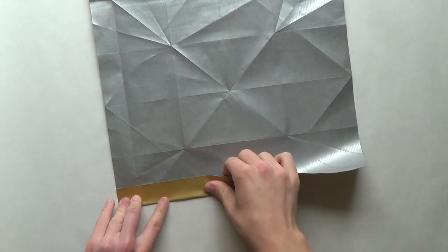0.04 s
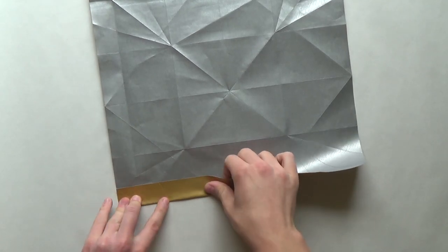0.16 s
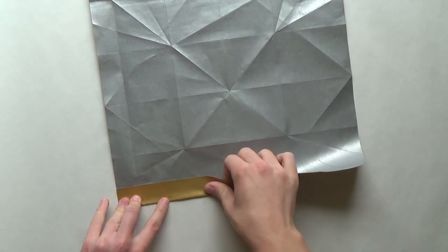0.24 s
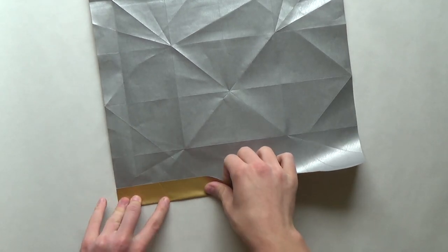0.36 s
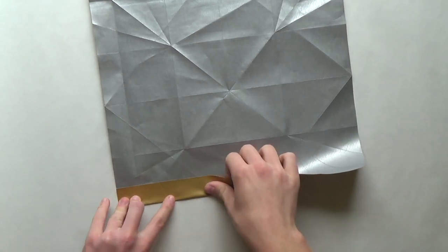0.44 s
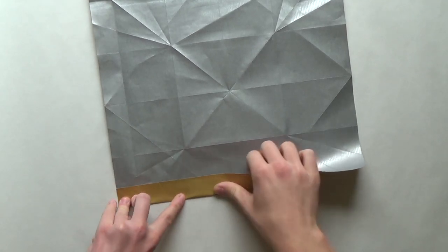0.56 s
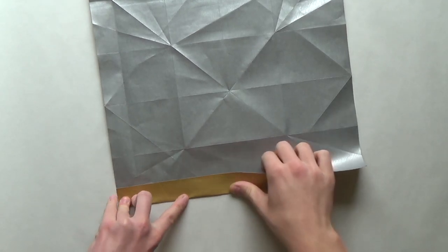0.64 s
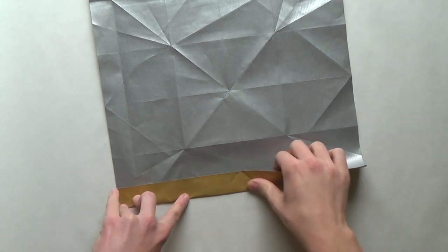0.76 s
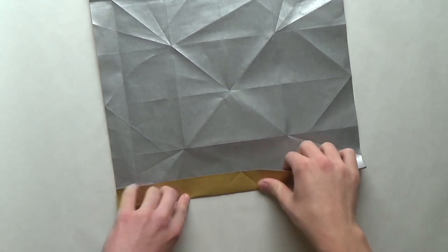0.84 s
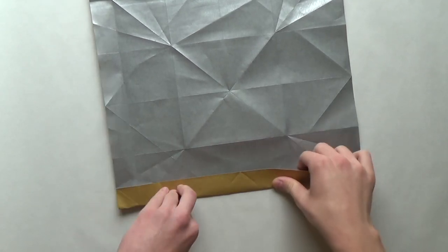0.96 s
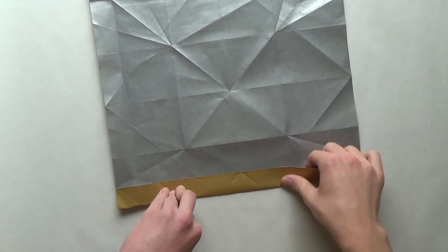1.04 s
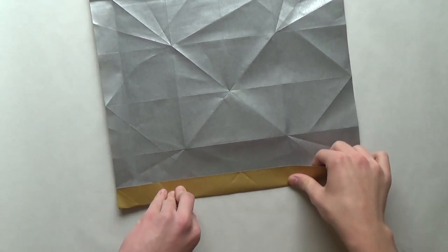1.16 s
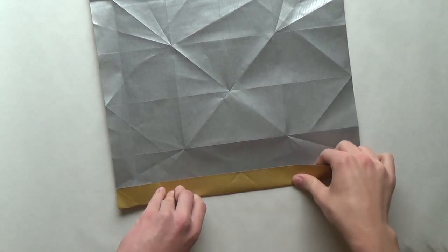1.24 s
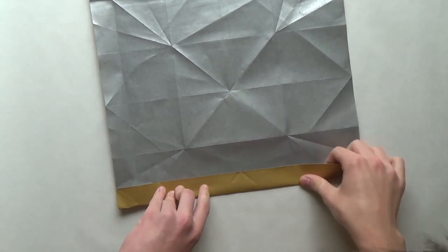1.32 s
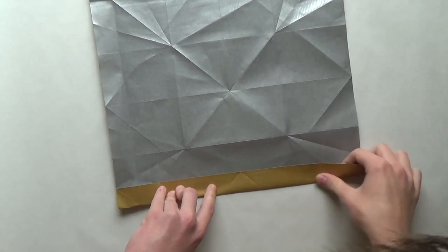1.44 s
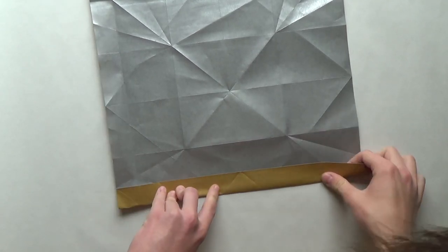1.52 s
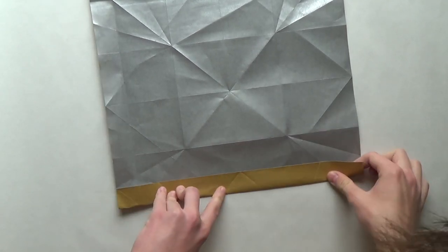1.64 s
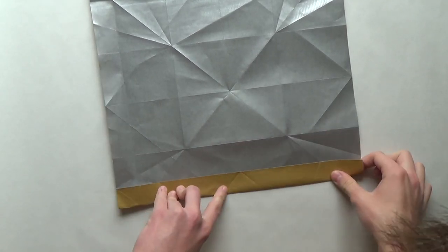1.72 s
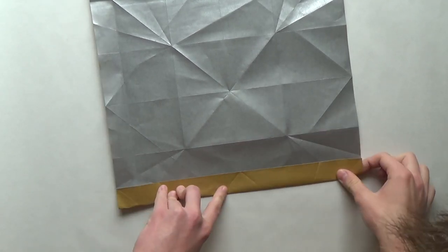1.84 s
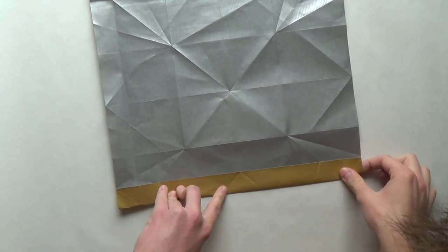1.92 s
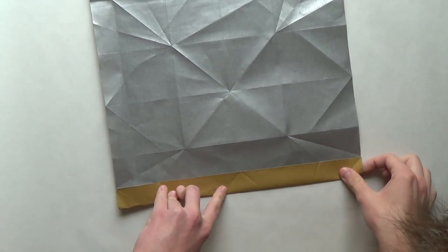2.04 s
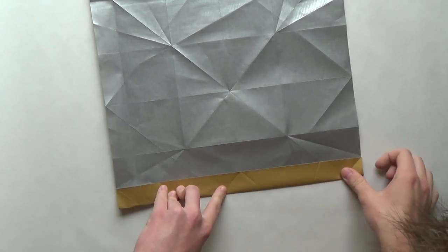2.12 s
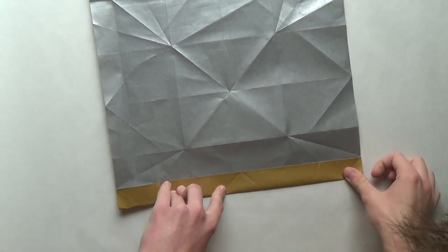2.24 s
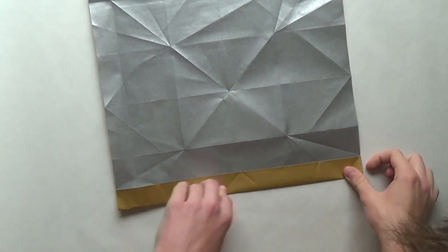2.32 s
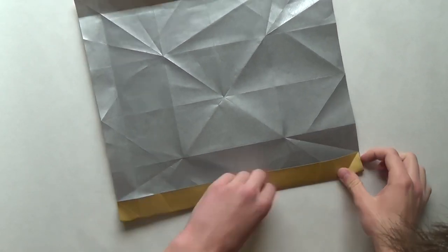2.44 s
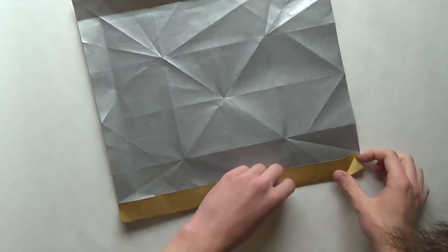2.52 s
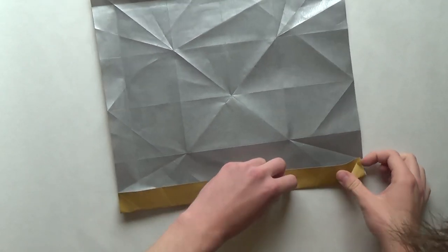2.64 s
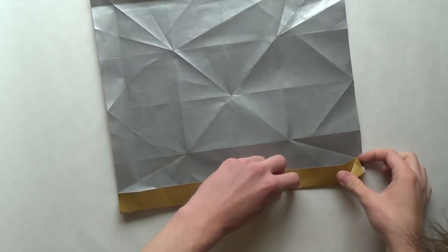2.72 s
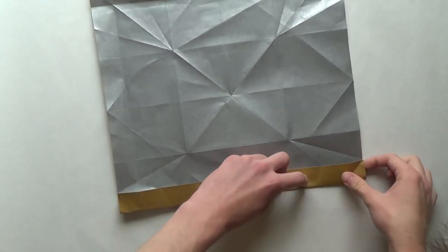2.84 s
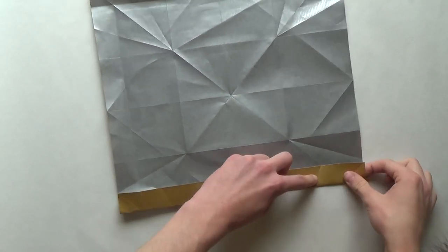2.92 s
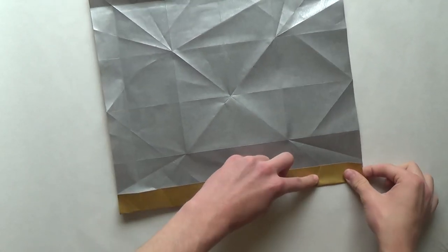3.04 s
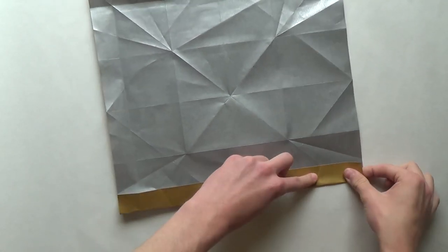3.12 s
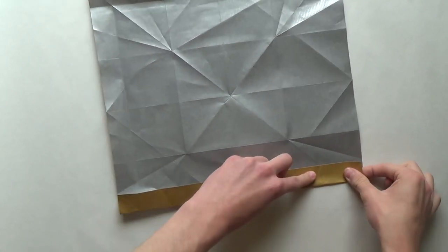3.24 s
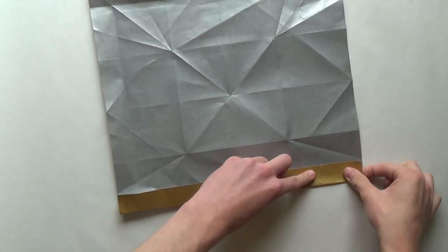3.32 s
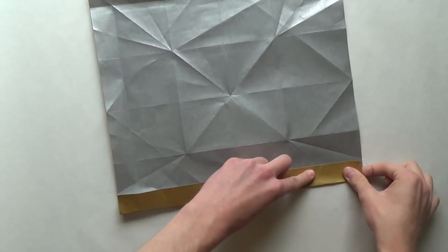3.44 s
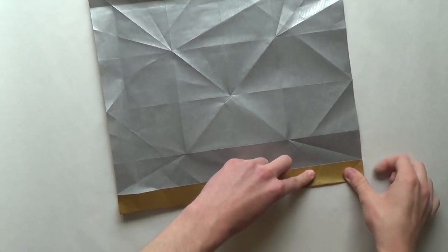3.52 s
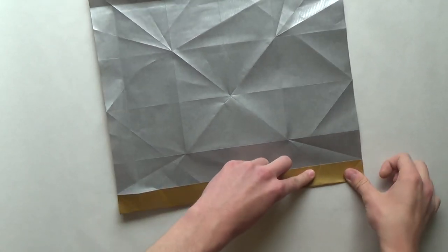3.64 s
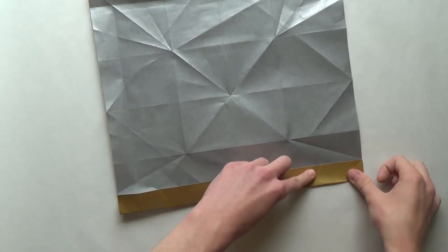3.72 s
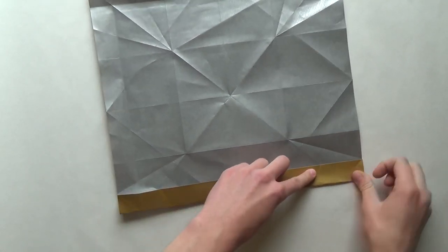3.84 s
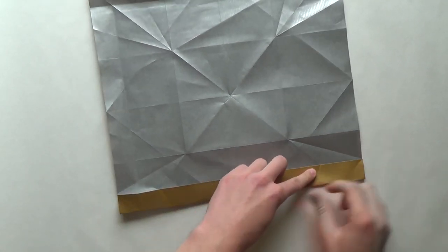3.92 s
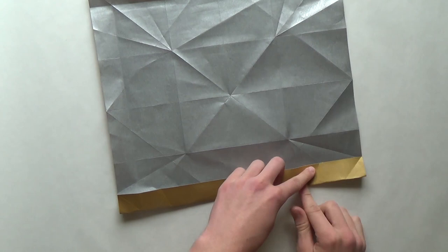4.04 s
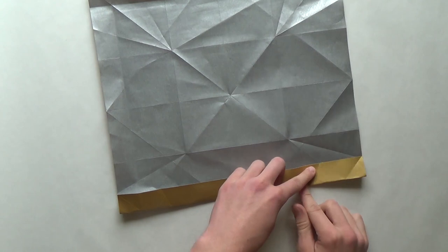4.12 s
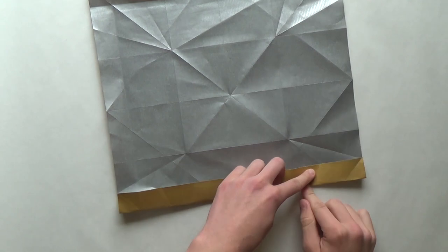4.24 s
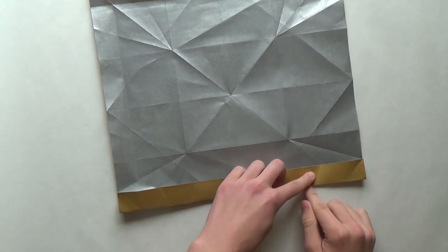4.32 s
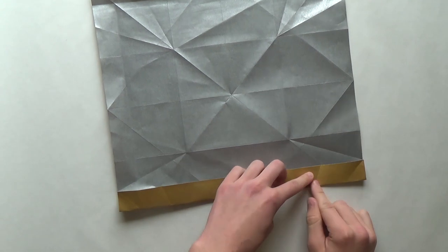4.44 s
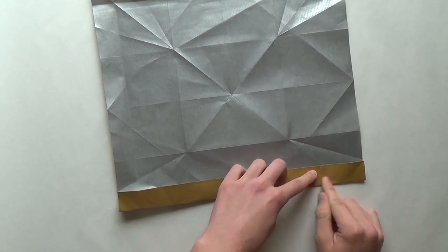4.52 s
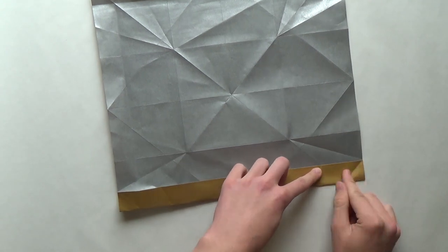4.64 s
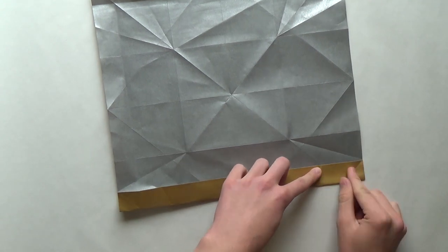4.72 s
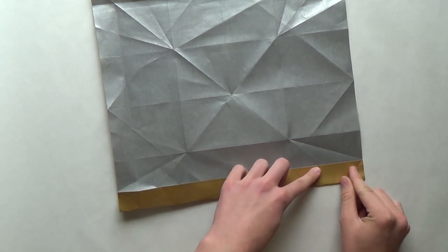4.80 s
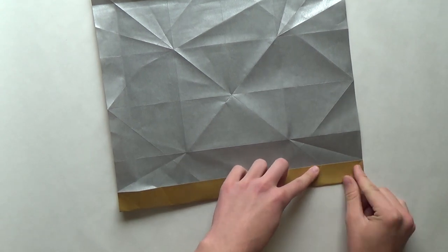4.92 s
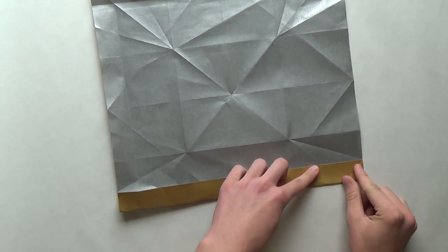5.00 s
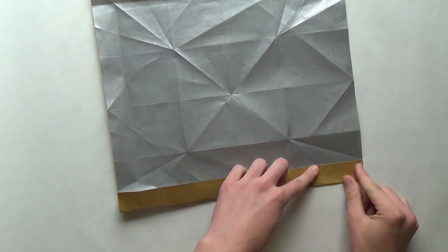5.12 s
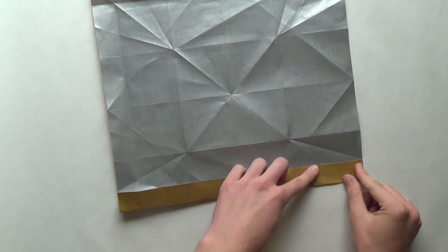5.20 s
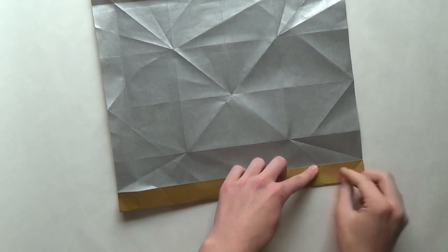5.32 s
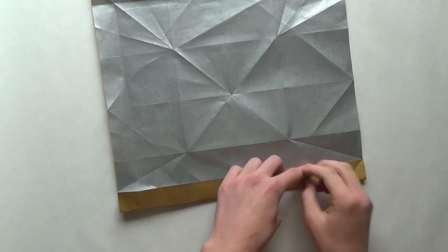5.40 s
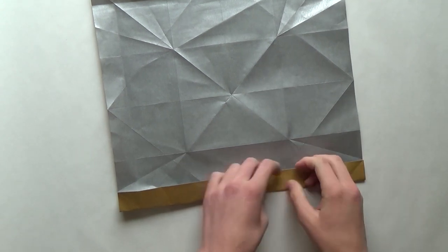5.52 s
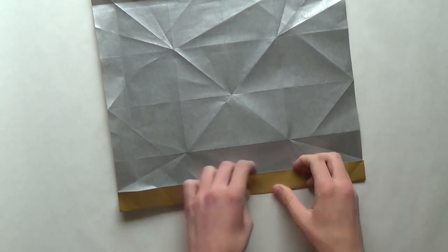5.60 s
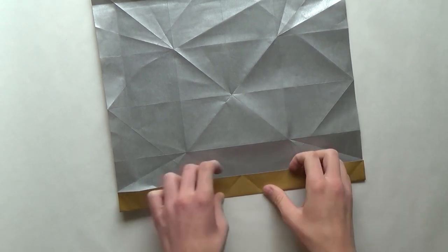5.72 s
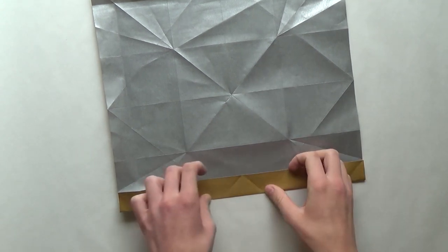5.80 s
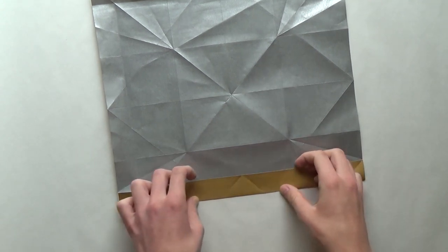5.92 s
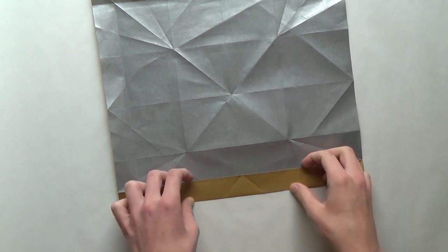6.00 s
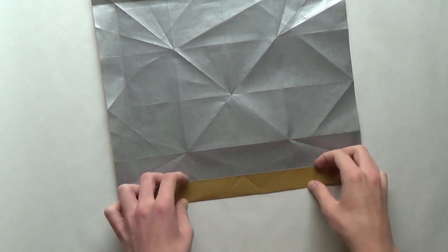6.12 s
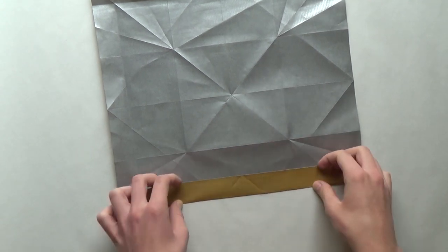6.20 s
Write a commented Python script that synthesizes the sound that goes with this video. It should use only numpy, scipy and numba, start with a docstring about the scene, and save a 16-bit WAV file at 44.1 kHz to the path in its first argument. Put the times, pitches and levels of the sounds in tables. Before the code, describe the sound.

In a quiet room, a close microphone hears stiff paper being creased on a tabletop. Dry swishes and scrapes from the fingers start softly and build, dotted with crackles and sharp ticks as the sheet buckles. After a brief lull come shorter strokes, more snaps and a few dull bumps of the hands, the strongest shortly before the last strokes. The bumps carry a slight low thud, stronger on the left.

```python
"""Fingers slide along a stiff paper sheet on a table, pressing a fold flat.
The paper's fibres catch and let go, which makes a hiss and a scrape; creases buckle with a snap.
Hands drag and knock on the table top and make it ring. The shaking travels up the stand of a
small camera above, and is stronger on the left. Behind it all is a quiet room."""
import sys
import numpy as np
from scipy import signal
from scipy.fft import rfft, irfft
from scipy.io import wavfile
from scipy.ndimage import uniform_filter1d
from numba import njit

SR = 44100
rng = np.random.default_rng(int(sys.argv[2]) if len(sys.argv) > 2 else 0)


def transcribe(u):
    """Save the signal u as a 16-bit wav file named by the first command-line argument.

    u: samples, shape (n,) or (channels, n), limited to [-1, 1]; the rate is SR.
    q: integer samples, one column per channel.
    """
    v = np.clip(np.atleast_2d(u).T, -1, 1)
    q = np.round(v * 32767).astype(np.int16)
    wavfile.write(sys.argv[1], SR, q)


N = 276264

# One list of points for each finger stroke:
# (time [s], hiss level [dB], sheet ring above hiss [dB], dull scrape above hiss [dB])
STROKES = [
    [(0.06, -67.5, 2, 2), (0.076, -56, -6, -6), (0.126, -55.5, -4, -9), (0.164, -66, 2, 9),
     (0.178, -71, -7, -10), (0.19, -73, 10, -3), (0.2, -68.5, 2, 5.5)],
    [(0.48, -66, 2, -12), (0.492, -60, -2, -4), (0.502, -61, -4, -0.5), (0.558, -48.5, 1.5, -3.5),
     (0.714, -42, 0.5, 1), (0.742, -38.5, -4.5, -7.5), (0.82, -46, -0.5, -6)],
    [(0.83, -44, -1, -6), (0.952, -38.5, -4.5, -13.5), (1.018, -43, 0.5, -5.5), (1.164, -43.5, -0.5, -9),
     (1.216, -52.5, 1, -7.5), (1.248, -47, -2, -14), (1.31, -56.5, 7.5, -10)],
    [(1.32, -54, 4.5, -3), (1.362, -41.5, -0.5, -14.5), (1.478, -44, -4, -15.5), (1.534, -41.5, -3, -23),
     (1.568, -43, 4.5, -13), (1.646, -52.5, 8, -5), (1.7, -50.5, -4, -7.5)],
    [(1.71, -52, -0.5, -14), (1.77, -54, 2, -8), (1.864, -50.5, 1.5, -15), (1.958, -60, 3, -9),
     (2.0, -56, 3, -5), (2.022, -56, 3, -10), (2.07, -64, 0, -4)],
    [(2.08, -72, 3, 1), (2.108, -56, 1.5, -18), (2.144, -61, 8, -8), (2.166, -54, 1.5, -9),
     (2.274, -63, -6, -5), (2.282, -57, -11, -4), (2.3, -69, -2, 0)],
    [(2.375, -64, -12, -5), (2.383, -62, -5, 4), (2.391, -49, -9, -4.5), (2.469, -46.5, 3.5, -14),
     (2.483, -40.5, -1, -16), (2.555, -38, -6.5, -11), (2.57, -41.5, 5, -8)],
    [(2.6, -43, 3, -9), (2.648, -46, -1, -8), (2.674, -39.5, -4.5, -15), (2.72, -40.5, -5, -15),
     (2.748, -47.5, -7, -8), (2.776, -45, 2.5, -6.5), (2.81, -56, 3, -4)],
    [(2.82, -55, -1, -4), (2.862, -51.5, 5, 1), (2.876, -51.5, 3.5, -9), (2.95, -45.5, -4, -7),
     (3.022, -48.5, 2.5, -7.5), (3.112, -62, 5.5, 4), (3.2, -62.5, -2, -6.5)],
    [(3.55, -83, -4, 1), (3.56, -51.5, -3.5, -8), (3.618, -47, 5.5, -8), (3.64, -53, -1, -5),
     (3.69, -64, 2, -6), (3.714, -80, 0, 7), (3.75, -77, 4, 2)],
    [(3.8, -60, -4, -13), (3.806, -65, -2, 2), (3.826, -58, -5, -18), (3.864, -60.5, -4, -6),
     (3.974, -58, -3, -14), (4.0, -85, 0, 0), (4.02, -81, 1, -4)],
    [(4.09, -64, 4, -18), (4.094, -50, 3, -8), (4.116, -59, 11.5, -1), (4.13, -41.5, -2, -6),
     (4.224, -78, 4, 12), (4.242, -65, -10, -9), (4.25, -65.5, 0, -2)],
    [(4.3, -63, -2, 0), (4.33, -60, -6, -12), (4.358, -56, 1, -3), (4.374, -60, 1, -12),
     (4.424, -63, -1, -1), (4.45, -52.5, 1, -9.5), (4.51, -64, 1, -8)],
    [(4.52, -59, -2, -5), (4.542, -54, -6, -20), (4.554, -57, -3, -5), (4.566, -55, -1, -16),
     (4.582, -54, -3, -5.5), (4.622, -47.5, -3.5, -13.5), (4.725, -45.5, -2, -12.5)],
    [(4.76, -46, -3, -1), (4.788, -54.5, -2, -3.5), (4.928, -66.5, -3, 1.5), (4.97, -58.5, -4, -4),
     (5.014, -62, -3, 2), (5.036, -78, 7, 7), (5.05, -76, 0, 0)],
    [(5.08, -78, 11, -1), (5.084, -79, 5, 6), (5.238, -82, 1, 0), (5.292, -65, 1, -1), (5.312, -72, -1, 6),
     (5.342, -62, -3, 2), (5.37, -69, -2, -1)],
    [(5.4, -73, -2, 4), (5.414, -55, -9, -12), (5.452, -52.5, -4, -19), (5.466, -59, -7, -8),
     (5.498, -60, -2, -18), (5.546, -52.5, -2, -13), (5.555, -43.5, 4.5, -15)],
    [(5.59, -48, 4, -1), (5.616, -50.5, -3, -2), (5.628, -45.5, -0.5, -7), (5.676, -50, -4.5, -2),
     (5.808, -46.5, -9, -3), (5.824, -50.5, -10, -1.5), (5.9, -51, -5, -4)],
    [(5.91, -52.5, -5, -4), (5.948, -52, -4, 2.5), (5.97, -50.5, -5, -2), (5.994, -50, -2.5, -2.5),
     (6.164, -48, -5, -6.5), (6.2, -51.5, -3, -2), (6.26, -52.5, -1, -8)],
]
# Where each stroke runs on the sheet sets its tone:
# (ring pitch [Hz], scrape pitch [Hz], table drag above scrape [dB], drag pitch [Hz])
STROKE_TONES = [(3470, 820, -3, 520), (3260, 1250, -7.5, 464), (3330, 1070, -5.5, 550),
                (3800, 1160, -3, 470), (4600, 1700, -0.5, 520), (4300, 1600, -11, 320),
                (3850, 1160, -9, 440), (3830, 1500, -4, 580), (3740, 1760, -2, 510), (4840, 1460, -9, 340),
                (3500, 1600, -11, 380), (4000, 1370, -1, 350), (3930, 1340, -1, 450), (4850, 1500, -6, 440),
                (3900, 1600, -7, 460), (3200, 1460, -21, 740), (4200, 1700, -11, 300),
                (3930, 790, -2.5, 720), (3430, 940, -1, 560)]
def finger_strokes():
    """The fingers' movement: three level curves, then four tone curves, with one value per sample."""
    rows = [tuple(point) + tone for stroke, tone in zip(STROKES, STROKE_TONES) for point in stroke]
    times, *columns = np.transpose(rows)
    return [np.interp(np.arange(N) / SR, times, column) for column in columns]


# The stiff sheet's own notes, damped by hands and table: (pitch [Hz], level [dB], fade time [s])
SHEET_NOTES = [(1727, 0.5, 0.14), (2233, -10.5, 0.23), (2836, -11.5, 0.12), (4440, -4.5, 0.04),
               (4970, 5.5, 0.0058), (5180, 17, 0.0067), (6610, 7.5, 0.0098)]
# The tone of the fine hiss: (frequency [Hz], relative level [dB])
HISS_TONE = [(1470, -35), (2500, -6), (3050, -4.5), (3920, -5), (6260, -1), (7120, -2.5), (10700, 1.5),
             (11600, -1.5), (15100, -42), (22000, -120)]
REST_HISS_DB, REST_WANDER_DB = -72.5, 3.5  # resting fingers still stir a little
def paper_rubbing():
    """Tiny slips are heard directly as hiss, through the bent sheet as a ring, through the fold as a scrape."""
    hiss_db, ring_db, scrape_db, ring_hz, scrape_hz = finger_strokes()[:5]
    pressure = np.hypot(undb(hiss_db), undb(REST_HISS_DB + REST_WANDER_DB * wander(12)))
    grip = undb(0.58 * wander(25))
    grit = fibre_slips(per_second=44, spread_db=0.3, fade_s=0.00092)
    grit = grit + undb(-28) * unit(ring(grit, SHEET_NOTES))  # the slips also stir the sheet's notes
    hiss = shape_tone(fibre_slips(37, 0.5, 0.0012), [(1500, -49)] + HISS_TONE)
    hiss *= undb(0.79 * wander(15))
    sheet = unit(keep_band(grit, ring_hz * (1 + 0.036 * wander(20)), width_hz=4160))
    sheet *= undb(ring_db + 0.65 * wander(15))
    scrape = unit(keep_band(fibre_slips(34, 0.46, 0.0075), scrape_hz, 1.44 * scrape_hz.mean()))
    scrape *= undb(scrape_db + 0.13 * wander(16))
    return pressure * grip * (hiss + sheet + scrape)


def fibre_slips(per_second, spread_db, fade_s):
    """Fibres catch and let go: a smooth hiss with short bursts of uneven size on top."""
    bursts = (rng.random(N) < per_second / SR) * undb(spread_db * rng.exponential(size=N))
    loudness = 1 + signal.lfilter([1], [1, -np.exp(-1 / (fade_s * SR))], bursts)
    return unit(loudness * rng.standard_normal(N))


# Creases that buckle:
# (time [s], level [dB], pitch [Hz], band width [times the pitch], rattle above click [dB])
SNAPS = [(0.0793, -36, 3220, 2.8, -11), (0.491, -39, 3730, 1.6, -13), (0.6683, -27, 2520, 1.8, -8),
         (0.716, -21.5, 1490, 1.4, -1), (0.9594, -35, 8910, 1.05, -10), (1.0108, -25, 2980, 1.7, -10),
         (1.157, -29.5, 4300, 1.6, -9), (1.3862, -25.5, 2940, 0.65, 0), (1.5594, -33, 3270, 0.55, -2),
         (2.1545, -38, 4770, 0.51, -5), (2.385, -46, 2500, 2.1, -11), (2.5776, -11, 3930, 1.4, -15),
         (2.582, -19, 2180, 1.2, -1), (2.6668, -20.5, 3870, 1.5, -16), (2.758, -32, 3430, 1.1, -21),
         (2.7813, -32, 2910, 0.92, -1), (2.8414, -28, 3220, 1.5, -14), (2.855, -31, 3180, 1.7, -6),
         (2.9226, -27, 3200, 2.6, -4), (2.9385, -25, 1850, 3.5, -7), (3.0626, -33, 2830, 1.5, -9.5),
         (3.5627, -42, 1080, 1.6, -21), (3.6132, -25, 5140, 2.8, -16), (3.6198, -29, 5130, 2.4, -16),
         (4.0886, -29.5, 5430, 0.66, -12), (4.095, -27.5, 3940, 0.81, -2), (4.133, -36, 1000, 0.52, -13),
         (4.1415, -33.5, 1050, 1.2, -19), (4.732, -15, 5730, 0.65, -16), (4.7396, -25.5, 3380, 1.6, -10),
         (4.7455, -17.5, 2730, 2.9, -16.5), (5.4121, -44, 9220, 1.1, -6), (5.5624, -19.5, 3280, 2, -5),
         (5.5744, -27.5, 1000, 0.62, -11), (5.941, -37, 2400, 0.35, -8)]
RATTLE_FADE_S, SHARP_EDGE_DB = 0.031, -11
def crease_snaps():
    """Each buckle is a sharp click and a short rattle that ring the patch of sheet that let go."""
    t = np.arange(6000) / SR
    out = np.zeros(N + len(t))
    for time, db, hz, width, rattle_db in SNAPS:
        force = rng.standard_normal(len(t)) * undb(rattle_db - 60 * t / RATTLE_FADE_S)
        force[int(.0006 * SR)] = 1  # the click comes just after the rattle starts
        sheet = undb(-44.5) * ring(force, SHEET_NOTES)[:len(t)]
        patch = keep_band(force + sheet, hz, width * hz)
        crack = patch / np.abs(patch).max() + undb(SHARP_EDGE_DB) * force
        start = int(time * SR)
        out[start:start + len(t)] += undb(db) * crack
    return cut_bass(out[:N], 800)


# Hands knocking on the table: (time [s], level [dB], pitch [Hz], band width [times the pitch])
KNOCKS = [(1.082, -39, 440, 0.7), (1.359, -37, 407, 0.32), (2.383, -47, 295, 0.88), (2.859, -50, 595, 1),
          (3.002, -39, 764, 0.65), (3.565, -38.5, 880, 0.53), (3.613, -43.5, 522, 0.82),
          (4.115, -41, 370, 0.97), (4.135, -30, 350, 0.23), (4.18, -32, 352, 0.26),
          (4.21, -38.5, 388, 0.62), (4.759, -44.5, 468, 0.41), (5.574, -20, 360, 0.64),
          (5.586, -18.5, 437, 0.78), (5.619, -31, 464, 0.39), (5.669, -38.5, 206, 0.27)]
# The table top's own notes: (pitch [Hz], level [dB], fade time [s])
TABLE_NOTES = [(203.1, -8.5, 0.53), (255, -3.5, 0.086), (305, 2.5, 0.042), (357, -2, 0.033),
               (394.3, -3, 0.073), (446.3, 0.5, 0.061), (509.7, -2, 0.061), (558.3, -2.5, 0.093),
               (602, 0, 0.089), (707, 0.5, 0.045), (852, -7, 0.14), (967, -2, 0.1)]
def table_top(push, drag_hz):
    """Dragging and knocking ring the table; where and how softly a finger lands picks the notes."""
    top = shake(push, TABLE_NOTES, drag_hz, width_hz=630)
    click = signal.unit_impulse(SR)
    for time, db, hz, width in KNOCKS:
        start = int(time * SR)
        knock = ring(keep_band(click, hz, width * hz), TABLE_NOTES)[:N - start]
        top[start:start + len(knock)] += undb(db) * knock / np.abs(knock).max()
    return top


# Hands and arms leaning on the table: (time [s], hold [s], stand sway [dB],
# stand bounce above sway [dB], table top level [dB], table top pitch [Hz])
JOLTS = [(0.126, 0.03, -72, 11, -58, 445), (0.326, .02, -62, -11, -77, 420),
         (0.503, 0.033, -56.5, 3, -61.5, 280), (1.037, 0.04, -48.5, 4, -71, 200),
         (1.108, 0.017, -53, 3, -53.5, 300), (1.32, 0.036, -60, -5, -65, 420),
         (1.5, .02, -55.5, -3, -61, 320), (2.393, 0.061, -70, 2, -55, 430),
         (2.875, 0.044, -72, 4, -77, 490), (3.565, 0.0081, -55.5, 4.5, -51, 465),
         (3.667, 0.12, -63, -8, -78, 350), (3.855, .05, -64, -12, -77, 300),
         (4.075, 0.014, -59, -5, -66, 188), (4.118, 0.042, -43.5, 3.5, -43, 345),
         (4.23, 0.02, -53.5, 3, -57, 306), (4.31, 0.0084, -71, 5, -73, 300),
         (4.6, 0.091, -61.5, -4, -65, 300), (4.749, 0.0089, -63, -1, -54, 480),
         (5.582, 0.039, -50.5, 4, -33, 350), (5.663, 0.07, -56.5, 3, -49.5, 280),
         (5.795, 0.011, -63, 1, -56, 544), (6.158, .01, -63, -3, -63, 550)]
JOLT_RISE_DB_PER_S, JOLT_FALL_DB_PER_S = 710, 294
REST_SWAY_DB, REST_BOUNCE_DB, REST_TOP_DB, REST_DRAG_HZ = -75.5, -74, -68.5, 383
def arm_pushes():
    """Resting, dragging and jolting arms push on the stand and table top; their powers add up."""
    hiss_db, _, scrape_db, _, _, drag_db, drag_hz = finger_strokes()
    t = np.arange(N) / SR
    drag = undb(hiss_db + scrape_db + drag_db) ** 2
    sway, bounce, rest = (undb(db + REST_WANDER_DB * wander(9)) ** 2
                          for db in (REST_SWAY_DB, REST_BOUNCE_DB, REST_TOP_DB))
    top = rest + drag
    pitch_sum = rest * REST_DRAG_HZ + drag * drag_hz  # stronger pushes count more in the average pitch
    for time, hold, sway_db, bounce_db, top_db, hz in JOLTS:
        shape_db = -JOLT_RISE_DB_PER_S * np.clip(time - t, 0, 1)
        shape_db -= JOLT_FALL_DB_PER_S * np.clip(t - time - hold, 0, 1)
        sway += undb(shape_db + sway_db) ** 2
        bounce += undb(shape_db + sway_db + bounce_db) ** 2
        jolt = undb(shape_db + top_db) ** 2
        top += jolt
        pitch_sum += jolt * hz
    return np.sqrt(sway), np.sqrt(bounce), np.sqrt(top), pitch_sum / top


# The stand's slow sway and its quicker bounce: (pitch [Hz], level [dB], fade time [s])
SWAY_NOTES = [(70, -2, 0.064)]
BOUNCE_NOTES = [(98.8, -2, 0.12), (120, -7.5, 0.073)]
# A wrist bumping the table edge: (time [s], strength [dB])
WRIST_BUMPS = [(.505, -51), (1.032, -38.5), (1.057, -40), (1.311, -53), (3.566, -45), (3.793, -49),
               (3.82, -50), (4.073, -41), (4.14, -35), (4.309, -52.5), (5.52, -51.5), (5.576, -31),
               (6.16, -52)]
def stand_rumble(sway_push, bounce_push):
    """Pushing arms make the camera stand sway and bounce; each wrist bump adds a low thud."""
    sway = shake(sway_push, SWAY_NOTES, hz=65.5, width_hz=45)
    bounce = shake(bounce_push, BOUNCE_NOTES, hz=105.6, width_hz=70)
    bumps = np.zeros(N)
    for time, db in WRIST_BUMPS:
        bumps[int(time * SR)] = undb(db)
    return sway + bounce + ring(bumps, BOUNCE_NOTES)


def room_echo(sound, fade_s=0.37, rise_s=0.0018):
    """The room answers a sound with a faint, short echo."""
    t = np.arange(SR // 3) / SR
    walls = rng.standard_normal(len(t)) * undb(-60 * t / fade_s) * np.clip(t / rise_s, 0, 1)
    return undb(-42) * signal.fftconvolve(sound, walls)[:N]


# The tone of the quiet room: (frequency [Hz], relative level [dB])
ROOM_TONE = [(15, -56), (25, -37), (53, -4), (108, -0.5), (216, -2), (294, -3), (401, -7), (620, -3),
             (936, -4), (1690, -9.5), (2480, -13), (3290, -11), (3750, -20.5), (6260, -13), (11600, -18),
             (15100, -51), (22000, -120)]
# A narrow hiss and a faint wavering hum: (pitch [Hz], band width [Hz], level [dB])
WHIRR, HUM = (3340, 130, -69), (720, 10, -86.5)
ROOM_DB = -60
def room_noise():
    """Steady room noise, a little wide in the bass only, with a narrow hiss and a faint hum."""
    middle, side = (shape_tone(rng.standard_normal(N), ROOM_TONE) for _ in range(2))
    side = signal.sosfilt(signal.butter(2, 500, fs=SR, output="sos"), side)
    out = undb(ROOM_DB) * (middle + undb(-6.5) * side * np.array([[1], [-1]]))
    for hz, width_hz, db in (WHIRR, HUM):
        out += undb(db) * unit(keep_band(rng.standard_normal(N), hz, width_hz, passes=1))
    return out


def undb(db):
    """Turn decibels into a number to multiply by."""
    return 10 ** (np.asarray(db) / 20)


def unit(x):
    """Scale a signal to an average strength (RMS) of 1."""
    return x / np.sqrt(np.mean(x ** 2))


def wander(per_second):
    """A smooth random drift with a typical size of 1."""
    step = int(SR / per_second)
    stairs = np.repeat(rng.standard_normal(N // step + 1), step)
    return unit(uniform_filter1d(uniform_filter1d(stairs, step), step)[:N])


def ring(force, notes):
    """A force sets an object's notes ringing; each drops 60 dB in its fade time."""
    t = np.arange(min(SR, len(force))) / SR
    body = sum(undb(db - 60 * t / fade_s) * np.sin(2 * np.pi * hz * t) for hz, db, fade_s in notes)
    return signal.fftconvolve(force, body)[:N]


def shake(strength, notes, hz, width_hz):
    """A random force near one pitch keeps an object's notes ringing."""
    noise = keep_band(rng.standard_normal(N), hz, width_hz)
    return ring(noise * strength, notes) / np.std(ring(noise, notes))


def shape_tone(x, points):
    """Filter a sound along (frequency [Hz], level [dB]) points, then scale it to strength 1."""
    hz, db = np.transpose(points)
    log_hz = np.log(np.arange(N // 2 + 1) * SR / N + 1)
    gain = undb(np.interp(log_hz, np.log(hz), db))
    return unit(irfft(rfft(x) * gain, N))


def keep_band(x, hz, width_hz, passes=2):
    """Keep the sound near one pitch; more passes cut the rest more steeply."""
    centre_hz = np.clip(hz, 20, .45 * SR) * np.ones(len(x))
    for _ in range(passes):
        x = band_filter(x, centre_hz, float(width_hz))
    return x


@njit
def band_filter(x, hz, width_hz):
    """A state-variable filter: it lets through a band whose centre can move."""
    out, band, low = np.empty(len(x)), 0., 0.
    for i in range(len(x)):
        tuning, damping = np.tan(np.pi * hz[i] / SR), width_hz / hz[i]
        swing = (band + tuning * (x[i] - low)) / (1 + tuning * (tuning + damping))
        band, low = 2 * swing - band, low + 2 * tuning * swing
        out[i] = damping * swing
    return out


def cut_bass(x, hz):
    """Turn down everything below the given frequency."""
    return signal.sosfilt(signal.butter(2, hz, "high", fs=SR, output="sos"), x)


TABLE_LEFT_DB, STAND_LEFT_DB = 3, 10  # how much louder on the left than on the right
def scene():
    """Mix the paper, the shaking table and stand, and the room into left and right."""
    snaps = crease_snaps()
    echo = room_echo(snaps)
    paper = paper_rubbing() + snaps + echo
    sway_push, bounce_push, top_push, drag_hz = arm_pushes()
    lean_left = np.array([[.5], [-.5]])
    top = table_top(top_push, drag_hz) * undb(TABLE_LEFT_DB * lean_left)
    stand = stand_rumble(sway_push, bounce_push) * undb(STAND_LEFT_DB * lean_left)
    return paper + cut_bass(top + stand, 45) + room_noise()


TREBLE_LIMIT_HZ = 11290
def record(dry):
    """The camera cuts off the highest treble."""
    return signal.sosfilt(signal.ellip(14, .3, 90, TREBLE_LIMIT_HZ, fs=SR, output="sos"), dry)


dry = scene()
out = record(dry)
transcribe(out)
```